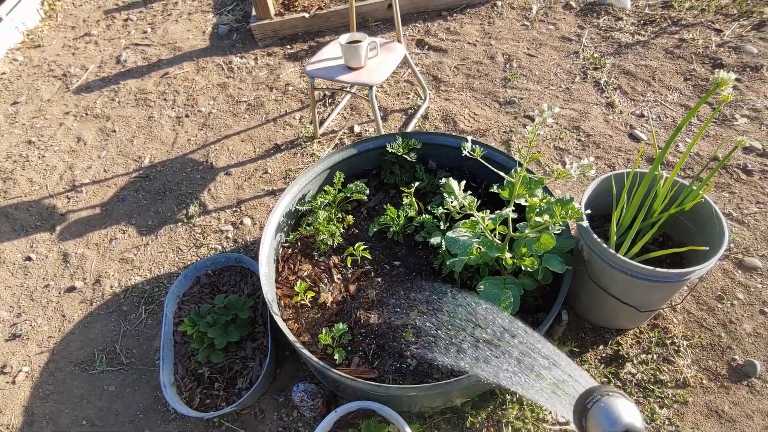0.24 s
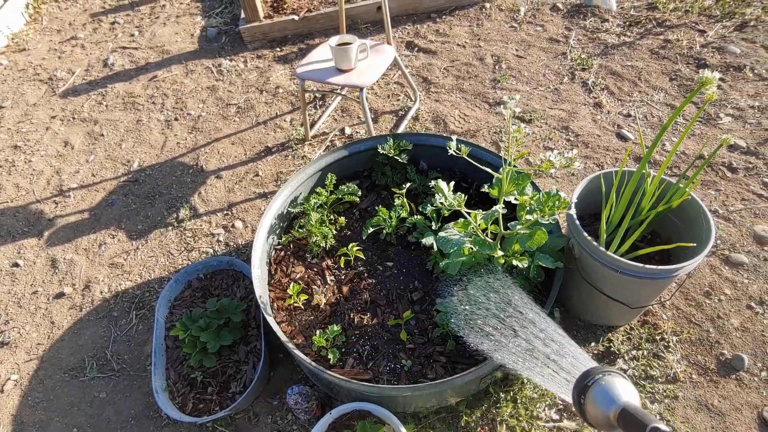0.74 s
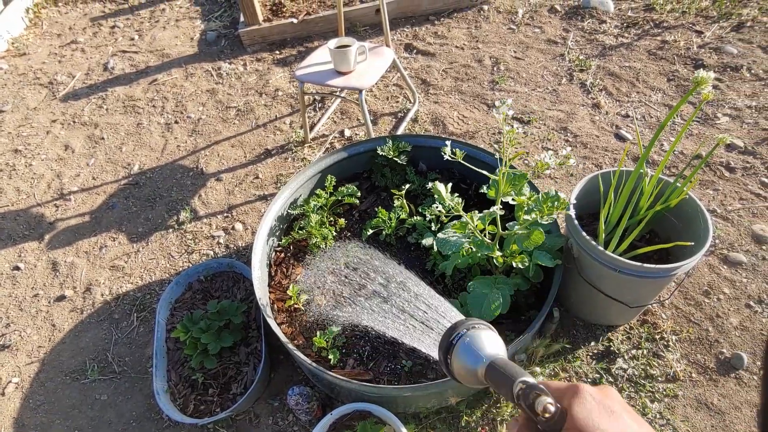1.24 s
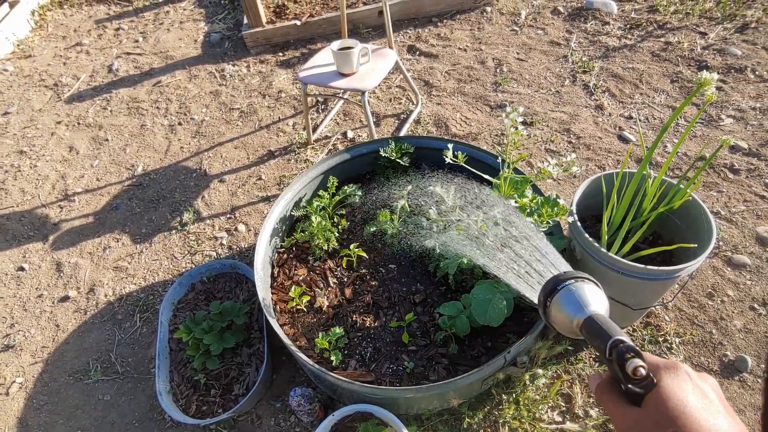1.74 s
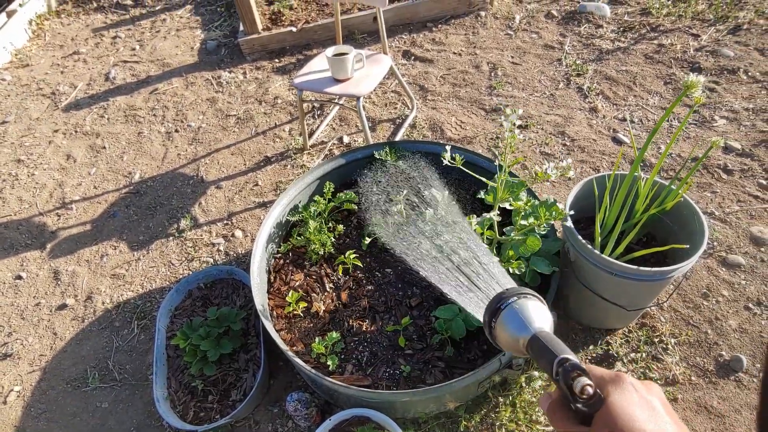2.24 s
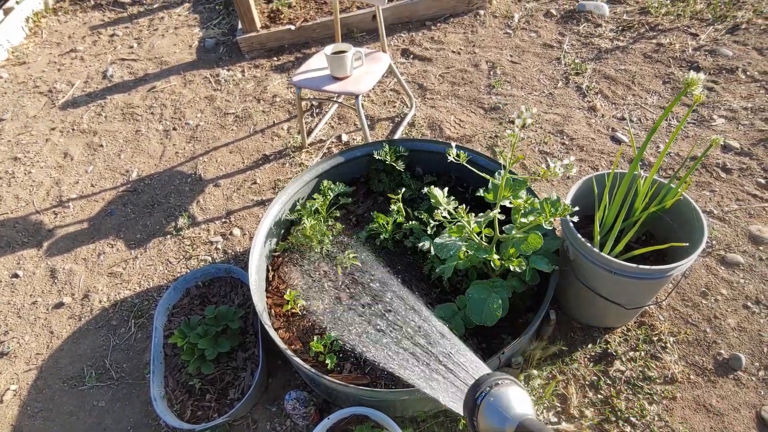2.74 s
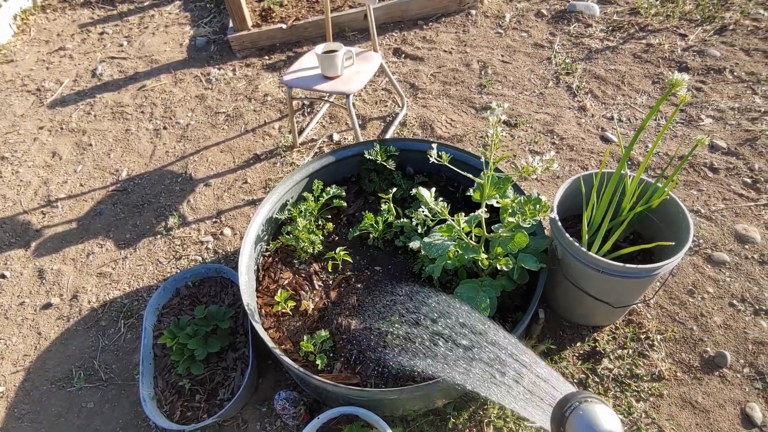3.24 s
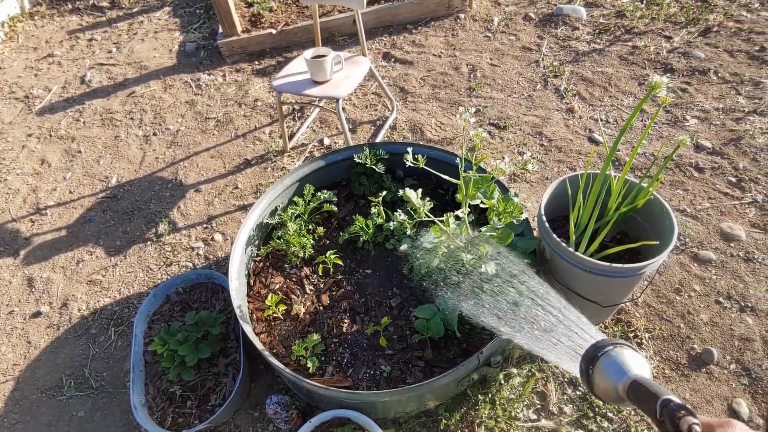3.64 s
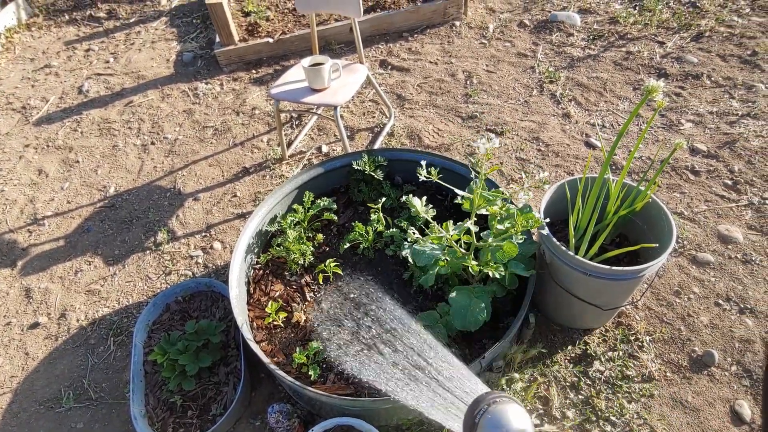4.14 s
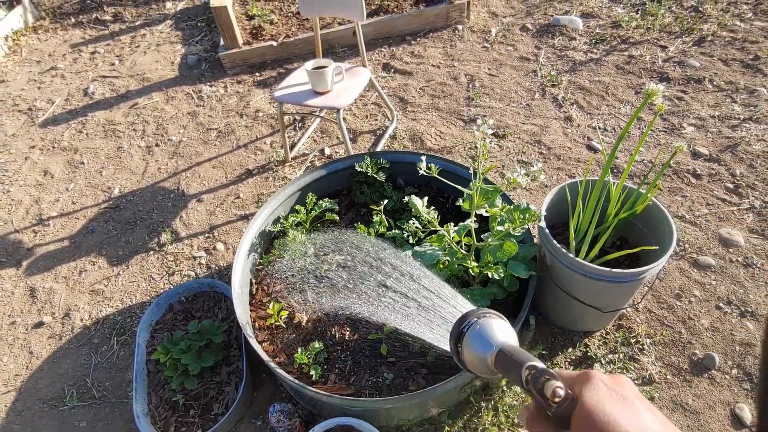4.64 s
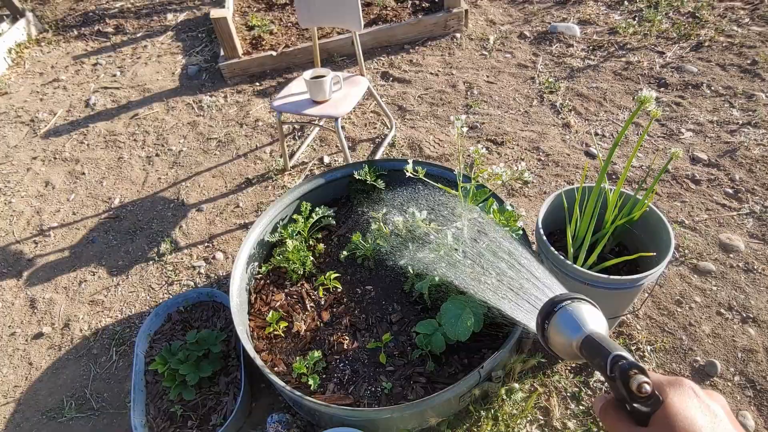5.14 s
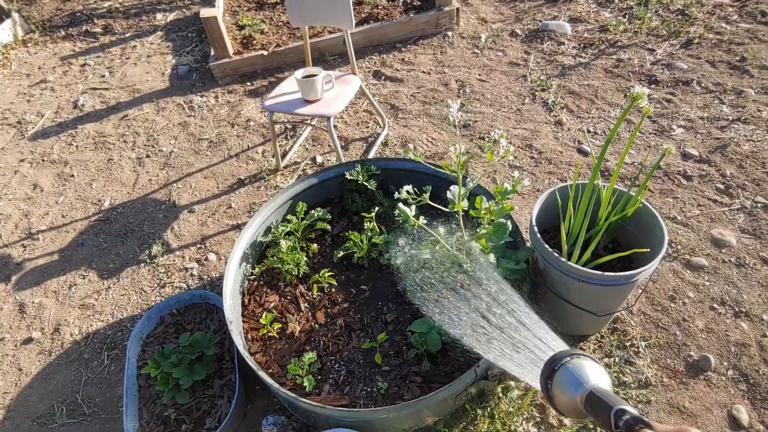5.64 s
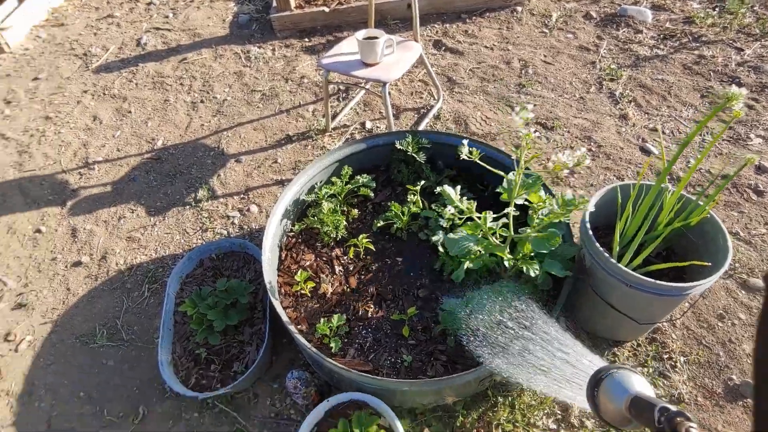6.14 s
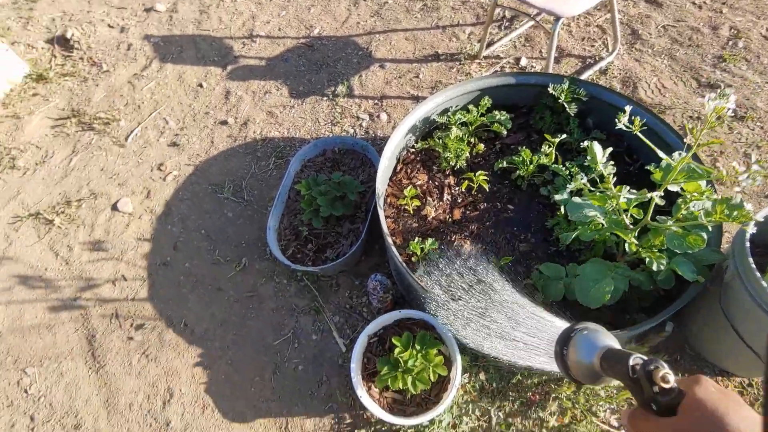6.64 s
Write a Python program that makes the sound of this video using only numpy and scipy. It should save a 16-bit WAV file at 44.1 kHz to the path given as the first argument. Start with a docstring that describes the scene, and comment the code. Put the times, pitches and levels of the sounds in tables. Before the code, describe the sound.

A hose shower nozzle hisses and sizzles steadily close by outdoors, water pattering on soil and drumming on leaves, with breathy ringing swells.

```python
"""Hose watering plants in a metal tub

A hose with a shower nozzle is heard outdoors from just behind the hand. Turbulence gives filtered noise
that hisses and fitfully sizzles; resonances sing and whistle. Random impacts patter brightly on bare soil
and drum more fully on leaves. Narrow noise bands make foam and gurgles, single fat drops smack, bubbles ping.
Puffs of air rumble on the microphone over a faint rumble and hum. Every level_db is a gain ahead of
any later filter, echo or balance.
"""
import sys
import numpy as np
from scipy import signal
from scipy.fft import rfft, irfft
from scipy.io import wavfile
from scipy.ndimage import map_coordinates

SR = 44100
rng = np.random.default_rng(int(sys.argv[2]) if len(sys.argv) > 2 else 0)


def unload_audio(sound):
    """Save the sound as a 16-bit wav file, at the path given as the first command line argument."""
    columns = np.transpose(np.atleast_2d(sound))
    # keep every value between -1 and 1, then stretch to whole-number steps
    steps = np.round(np.clip(columns, -1, 1) * 32767)
    wavfile.write(sys.argv[1], SR, steps.astype(np.int16))


N = 303408


def from_db(db):
    """Logarithmic level: 20 dB is a tenfold amplitude gain."""
    return 10 ** (np.asarray(db) / 20)


def rms_one(x):
    """Power normalisation: scale to unit rms."""
    return x / np.sqrt(np.mean(x ** 2) + 1e-20)


def in_time(rows):
    """Linear interpolation: each column of a time curve at every sample."""
    s, *columns = np.transpose(rows)
    return [np.interp(np.arange(N) / SR, s, c) for c in columns]


def drift(rate_hz):
    """Low-passed random process: white noise through two equal poles at rate_hz, spread 1."""
    step = 40    # samples between computed points
    r = np.exp(-2 * np.pi * rate_hz * step / SR)
    settle = 2000    # points dropped while the filter settles
    slow = signal.lfilter([1], [1, -2 * r, r * r], rng.standard_normal(N // step + settle + 2))[settle:]
    return np.interp(np.arange(N) / step, np.arange(len(slow)), rms_one(slow))


def colour(x, points, size=8192):
    """Minimum-phase filtering: a causal response whose magnitude follows (frequency_hz, gain_db)."""
    hz, db = np.transpose(points)
    grid = np.maximum(np.fft.rfftfreq(size, 1 / SR), 1)
    log_magnitude = np.log(from_db(np.interp(np.log(grid), np.log(hz), db)))
    cepstrum = irfft(log_magnitude)
    # folding the cepstrum onto positive time makes the response causal
    cepstrum[1:size // 2] *= 2
    cepstrum[size // 2 + 1:] = 0
    response = irfft(np.exp(rfft(cepstrum)))[:size // 2]
    return signal.oaconvolve(x, response[None], axes=1)[:, :N]


def stereo_noise(alike):
    """Partial coherence: white noise on two channels that share this fraction of their power."""
    alike = np.clip(alike, 0, 1)
    common = np.sqrt(alike) * rng.standard_normal(N)
    return common + np.sqrt(1 - alike) * rng.standard_normal((2, N))


def panned(x, left_db):
    """Interaural level difference: the left channel exceeds the right by left_db."""
    return x * from_db([[left_db / 2], [-left_db / 2]])


def bell(centre_s, spread_s):
    """Gaussian envelope: gain 1 at its centre, with spread_s as standard deviation."""
    t = np.arange(N) / SR
    return np.exp(-((t - centre_s) / spread_s) ** 2 / 2)


def burst(start_s, length_s, attack_s, release_s):
    """Exponential envelope: rises to 1 by the start, holds, then dies away."""
    t = np.arange(N) / SR
    before = np.maximum(start_s - t, 0) / attack_s
    after = np.maximum(t - start_s - length_s, 0) / release_s
    return np.exp(-np.minimum(before + after, 30))


def droplets(per_s, size_db, scatter_ms, scatter_db):
    """Shot noise: random impacts of uneven size, each with its own lag and balance between the ports."""
    at = np.flatnonzero(rng.random(N) < per_s / SR)
    size, side, lean = np.clip(rng.standard_normal((3, len(at))), -2.5, 2.5)
    push = from_db(size_db * size) * rng.choice([-1, 1], len(at))
    lag = np.round(scatter_ms * side * SR / 1000).astype(int)
    left = np.bincount((at + lag) % N, push * from_db(scatter_db * lean / 2), N)
    right = np.bincount(at, push * from_db(-scatter_db * lean / 2), N)
    return rms_one(np.array([left, right]))


def plinks(per_s, size_db, cycles, low_hz, high_hz, count=36):
    """Damped resonance: random impulses ring two-pole resonators, falling 60 dB in the given cycles."""
    at = np.flatnonzero(rng.random(N) < per_s / SR)
    size = np.clip(rng.standard_normal(len(at)), -2, 2)
    push = from_db(size_db * size) * rng.choice([-1, 1], len(at))
    dealt = rng.integers(0, count, len(at))    # which resonator each impulse strikes
    out = np.zeros((2, N))
    for k, hz in enumerate(np.geomspace(low_hz, min(high_hz, SR / 3), count)):
        w = 2 * np.pi * hz / SR
        r = np.exp(-np.log(1000) * hz / (cycles * SR))
        clicks = np.bincount(at[dealt == k], push[dealt == k], N) + 1e-18
        rung = w * signal.lfilter([np.sin(w)], [1, -2 * r * np.cos(w), r * r], clicks)
        out += panned(rung, rng.normal(0, 4))
    return rms_one(out)


def narrow_band(pitch_hz, width_hz):
    """Frequency shifting: low-passed complex noise is moved up to sing around a pitch; rms 1."""
    cloud = stereo_noise(alike=0.22) + 1j * stereo_noise(alike=1.0)
    cloud = signal.sosfilt(signal.butter(2, width_hz / 2, fs=SR, output="sos"), cloud)
    phase = 2 * np.pi * np.cumsum(pitch_hz * np.ones(N)) / SR
    return rms_one(np.real(cloud * np.exp(1j * phase)))


def tub_echoes(x, echo_db, longest_ms, swing, count=5):
    """Comb filtering: short tub-wall echoes on slowly wandering paths make the colour ripple."""
    out, now, gain = x.copy(), np.arange(N), from_db(echo_db)
    for share in np.geomspace(.15, 1, count):
        path = share * longest_ms * SR / 1000 * np.exp(swing * drift(.45))    # nominal longest path
        for ear in (0, 1):
            delay = np.round(path + rng.normal(0, 2)).astype(int)
            out[ear] += gain * x[ear].take(now - delay, mode="wrap")
    return out / np.sqrt(1 + count * gain ** 2)


def nozzle():
    """Superposition: steady hiss, fitful sizzle and three kinds of resonance add at the nozzle."""
    sizzling, whistling = sizzle_fits()
    crackle = droplets(per_s=25000, size_db=1.0, scatter_ms=.035, scatter_db=9.0)
    crackle = crackle * from_db(1.0 * drift(22))
    jet = hiss() + sizzle(crackle, sizzling, whistling) + head_ring(crackle, sizzling)
    return jet + hollow() + hole_whistles()


# slow course of the hiss: time_s, level_db
HISS_LEVEL = [(0, -26), (.75, -30.5), (1.75, -32.5), (2.0, -32), (3.3, -31.5), (3.45, -23), (4.4, -27.5),
              (6.0, -34.5), (6.88, -35)]
# spectrum of the hiss: frequency_hz, gain_db
HISS_COLOUR = [(150, -9), (280, -12.5), (385, -5.5), (560, -17.5), (720, -22), (1000, -18), (1250, -21),
               (1550, -7.5), (1950, -19.5), (2400, -11.5), (5000, -10.5), (11000, -28), (15000, -5)]


def hiss():
    """Turbulence noise: dense random impulses at the holes fuse into a coloured hiss."""
    level_db, = in_time(HISS_LEVEL)
    turbulence = droplets(per_s=25000, size_db=3.5, scatter_ms=0.043, scatter_db=5.5)
    turbulence = turbulence * from_db(level_db + 1.0 * drift(28.0))
    return panned(colour(turbulence, HISS_COLOUR), left_db=-2.5)


# fits of sizzling: start_s, length_s, level_db, whistle_db (relative to the sizzle)
SIZZLE_FITS = [(0.0, 0.13, -21.5, -8), (.52, 0.04, -18.5, -13), (0.628, .02, -22, -4),
               (0.8, .09, -16.5, -6), (0.89, 0.99, -14, -1.5), (1.967, 0.014, -20.5, -7),
               (2.1, 0.05, -19.5, -6), (2.447, .018, -23.5, -10.5), (3.375, 0.2, -20.5, 8),
               (3.64, .18, -22, -1), (4.37, 0.054, -13.5, -12), (4.555, 0.5, -14, -15),
               (5.1, 1.85, -21.5, -17)]
SIZZLE_ATTACK_S, SIZZLE_RELEASE_S = .008, .011
SIZZLE_IDLE_DB, WHISTLE_IDLE_DB = -36, -31    # floors between fits
# drop from the middle of a fit to its ends; a negative one is a rise
SIZZLE_ARCH_DB, WHISTLE_ARCH_DB = 2, -0.5


def sizzle_fits():
    """Intermittency: gains of sizzle and whistle start abruptly, arch slightly and cut out."""
    t = np.arange(N) / SR
    sizzling, whistling = from_db(SIZZLE_IDLE_DB), panned(from_db(WHISTLE_IDLE_DB), left_db=2)
    for start_s, length_s, db, whistle_db in SIZZLE_FITS:
        off_middle = (2 * np.clip((t - start_s) / length_s, 0, 1) - 1) ** 2
        fit = from_db(db) * burst(start_s, length_s, SIZZLE_ATTACK_S, SIZZLE_RELEASE_S)
        sizzling = np.maximum(sizzling, fit * from_db(-SIZZLE_ARCH_DB * off_middle))
        whistling = np.maximum(whistling, fit * from_db(whistle_db - WHISTLE_ARCH_DB * off_middle))
    return sizzling, whistling


# spectrum of the sizzle: frequency_hz, gain_db
SIZZLE_COLOUR = [(1200, -43.5), (1550, -22.5), (1850, -17.5), (2200, -27), (3100, -38), (3600, -14),
                 (4200, -14), (5000, -20.5), (6700, -9.5), (7600, -23), (8500, -16.5), (10300, -12),
                 (12500, -13), (15000, -8)]
# spectrum of the thin, airy whistle of the holes: frequency_hz, gain_db
WHISTLE_COLOUR = [(3000, -78), (6700, -16), (7250, -5.5), (7560, -10.5), (7850, -9), (8500, -16.5),
                  (15000, -54.5)]


def sizzle(crackle, sizzling, whistling):
    """Common excitation: one crackle drives both the broad sizzle and the thin whistle."""
    broad = colour(crackle * sizzling, SIZZLE_COLOUR)
    thin = colour(crackle * whistling, WHISTLE_COLOUR)
    return panned(broad + thin, left_db=-3.0)


# swelling and fading of the spray head's bright ring: time_s, level_db
RING_LEVEL = [(0, -36), (.78, -27), (.83, -25), (1.05, -17.5), (1.22, -18), (1.32, -10), (1.54, -8),
              (1.72, -14), (1.86, -27), (1.9, -35), (2.4, -28.5), (3.33, -33), (3.45, -13), (3.6, -26),
              (3.76, -12), (3.9, -32), (4.33, -28), (4.41, -20), (4.51, -35), (4.57, -12.5), (4.97, -10),
              (5.25, -16.5), (5.7, -19.5), (6.88, -13)]
# resonances of the spray head: frequency_hz, gain_db
RING_COLOUR = [(2200, -46), (3150, -35), (3380, -7.5), (3560, -1), (3700, -6), (3950, -3.5), (4250, -7),
               (4900, -31.5), (8000, -58.5)]


def head_ring(crackle, sizzling):
    """Forced resonance: crackle excites the spray head, harder during each sizzle fit."""
    level_db, = in_time(RING_LEVEL)
    ringing = np.hypot(from_db(level_db), from_db(-2) * sizzling)
    ring = colour(crackle * ringing * from_db(1.73 * drift(19.0)), RING_COLOUR)
    return panned(ring, left_db=1.0)


# low singing of the hollow behind the nozzle's face: time_s, level_db
HOLLOW_LEVEL = [(0, -28), (.7, -30.5), (1.05, -28), (1.35, -22.5), (1.7, -24), (1.95, -31), (2.9, -31),
                (3.3, -38), (3.45, -23), (3.58, -38), (4.05, -36), (4.35, -24.5), (4.85, -24.5), (5.2, -27),
                (5.4, -41), (6.88, -43)]
# resonances of that hollow: frequency_hz, gain_db
HOLLOW_COLOUR = [(800, -46), (1250, -27), (1400, -11.5), (1520, -3.5), (1600, -5), (1660, 0.5),
                 (1730, -3.5), (1830, -16), (2000, -28), (2600, -40), (5000, -59)]


def hollow():
    """Cavity resonance: the hollow sings as coloured noise, with a thin note inside it."""
    level_db, = in_time(HOLLOW_LEVEL)
    breath = stereo_noise(alike=0.81) * from_db(level_db + 1.5 * drift(15))
    note_db = -27    # added to the hollow's level
    return panned(colour(breath, HOLLOW_COLOUR) + from_db(level_db + note_db) * flow_note(), left_db=-.5)


def flow_note():
    """Frequency modulation: a thin tone trembles in pitch and flutters in level; rms 1."""
    hz = 1662 * np.exp(.013 * drift(34.9))
    return rms_one(np.sin(2 * np.pi * np.cumsum(hz) / SR) * from_db(3.5 * drift(30)))


# momentary whistles of single holes: centre_s, spread_s, pitch_hz, level_db, left_db
HOLE_WHISTLES = [(1.04, 0.1, 7400, -37.5, -2), (1.43, 0.18, 7600, -39.5, -5), (1.15, .18, 18000, -48, -3),
                 (1.5, .13, 9300, -45, 2), (1.4, .3, 14700, -38, 8), (1.69, 0.1, 10250, -39, -8),
                 (1.62, .06, 11350, -48, 5), (6.12, 0.11, 8050, -37, -4), (6.13, .08, 5600, -39, 7),
                 (6.65, 0.16, 7950, -39, -11)]


def hole_whistles():
    """Narrow-band noise: single holes whistle breathily, swell and fade, and wander in pitch."""
    out = np.zeros((2, N))
    for centre_s, spread_s, hz, db, left_db in HOLE_WHISTLES:
        whistle = narrow_band(hz * np.exp(.012 * drift(2.5)), width_hz=0.052 * hz)
        out += panned(from_db(db) * bell(centre_s, spread_s) * whistle, left_db)
    return out


# force of the spray on the soil as the fan of drops wanders: time_s, level_db
SOIL_LEVEL = [(0, -29.5), (.55, -28.5), (.72, -39.5), (1.02, -28.5), (1.42, -35), (1.86, -29.5),
              (1.92, -42), (2.45, -40.5), (3.355, -29.5), (3.38, -22.5), (3.6, -23), (3.9, -31),
              (4.0, -23.5), (4.7, -22.5), (5.22, -24.5), (5.3, -29), (5.6, -29), (6.09, -18.5),
              (6.33, -24.5), (6.7, -20), (6.88, -24.5)]
# lean of the landing spray as the hand swings, then moves on: time_s, left_db
AIM = [(0, 3), (.6, 0), (2.0, 2.5), (2.8, 4.5), (3.6, 1.5), (4.6, 2.5), (6.2, 1)]


def landing_spray():
    """Superposition: water on soil, leaves and foam adds up and leans with the aim."""
    soil_db, = in_time(SOIL_LEVEL)
    lean_db, = in_time(AIM)
    leaf_db = leaf_level(soil_db)
    landing = soil(soil_db) + leaves(leaf_db) + splashing(leaf_db)
    return landing * from_db([lean_db / 2, -lean_db / 2])


def fluttering(level_db):
    """Amplitude modulation: uneven break-up of the streams makes a landing gain flutter."""
    return from_db(level_db + 1.3 * drift(22))


# spectrum of drops on soil: frequency_hz, gain_db
SOIL_COLOUR = [(150, -19.5), (1500, -26), (3000, -4), (5000, -5), (7200, -1.5), (8200, -2.5), (10000, -6),
               (15000, -1.5)]


def soil(level_db):
    """Impact noise: fine ticks, sparse coarse ones and ringing bubbles patter on wet earth."""
    ticks = droplets(per_s=6000, size_db=3.0, scatter_ms=.07, scatter_db=3.5)
    coarse = droplets(per_s=130, size_db=2.0, scatter_ms=.07, scatter_db=5.0)
    coarse = signal.sosfilt(signal.butter(2, [5500, 13000], "band", fs=SR, output="sos"), coarse)
    fizz = plinks(per_s=600, size_db=3.5, cycles=65, low_hz=5320, high_hz=14600)
    patter = ticks + from_db(-6.0) * coarse + from_db(-12.0) * fizz
    return colour(patter * fluttering(level_db), SOIL_COLOUR)


# passes of the spray over leaves: start_s, length_s, level_db
LEAF_PASSES = [(0.358, 0.2623, -26.5), (0.875, .12, -28.5), (3.385, 0.1693, -25), (3.58, 0.1213, -21),
               (3.72, 0.3297, -23), (4.599, .55, -29.5), (5.2, .58, -24), (5.84, 0.11, -19),
               (6.172, .28, -23), (6.849, .05, -21.5)]


def leaf_level(soil_db):
    """Energy addition: passes, a steady trickle and rebound from the soil sum in power, in dB."""
    passes = [from_db(db) * burst(start_s, length_s, attack_s=.02, release_s=.09)
              for start_s, length_s, db in LEAF_PASSES]
    strongest = np.max(passes, axis=0)
    trickle, rebound = from_db(-39), from_db(soil_db - 10)
    return 10 * np.log10(strongest ** 2 + trickle ** 2 + rebound ** 2)


# spectrum of drops on leaves: frequency_hz, gain_db
LEAF_COLOUR = [(100, -30.5), (200, -10), (300, -6.5), (400, -5.5), (520, -5), (650, -9), (800, -11),
               (1100, -13), (1350, -14), (2100, -7.5), (3200, -1.5), (5000, -6.5), (8000, -12.5),
               (15000, -11)]


def leaves(level_db):
    """Struck resonators: drops drum on leaves with taps, rings and soft low thuds."""
    taps = droplets(per_s=6000, size_db=5.0, scatter_ms=.06, scatter_db=6.5)
    rings = plinks(per_s=600, size_db=15.5, cycles=220, low_hz=897, high_hz=4428)
    thuds = plinks(per_s=160, size_db=5.5, cycles=15, low_hz=144, high_hz=1013)
    splatter = taps + from_db(-15.0) * rings + from_db(-23.0) * thuds
    return panned(colour(splatter * fluttering(level_db), LEAF_COLOUR), left_db=-0.7)


# gurgles and froth where the jet digs into soil or fills a leaf: centre_s, spread_s, pitch_hz, level_db
GURGLES = [(0.55, 0.038, 275, -48), (0.9, 0.035, 620, -48), (3.648, 0.14, 200.6, -52),
           (4.043, 0.14, 258, -47.5), (4.85, 0.13, 1877, -45.5), (5.927, 0.081, 408.4, -42),
           (6.104, 0.13, 2050, -46.5), (6.38, 0.13, 1080, -48.5), (6.598, 0.13, 399, -47),
           (6.65, 0.22, 2053, -44.5), (6.856, 0.053, 624, -41.5)]


def splashing(leaf_db):
    """Bubble resonance: foam sings higher the harder the leaves are hit; hollows gurgle briefly."""
    foam_hz = 1968 + 16 * (leaf_db + 29)    # rises 16 Hz per dB
    foam_db = 1.097 * leaf_db - 19.0    # foam builds up faster than the drumming that makes it
    out = narrow_band(foam_hz * np.exp(.07 * drift(6)), width_hz=900) * fluttering(foam_db)
    for centre_s, spread_s, hz, db in GURGLES:
        out = out + from_db(db) * bell(centre_s, spread_s) * narrow_band(hz, width_hz=0.25 * hz)
    return out


# swing of the hand from side to side, as delay of the left port: time_s, lag_ms
SWING = [(0, .08), (.7, .17), (1.05, .06), (1.35, .005), (1.9, .09), (2.65, .03), (3.3, .07), (3.75, .14),
         (4.1, .06), (4.6, .005), (5.0, .06), (5.45, .1), (5.95, .06), (6.5, .17), (6.88, .07)]


def swung(x):
    """Interaural time difference: the left port hears the spray with a varying lag."""
    lag_ms, = in_time(SWING)
    heard_at = np.arange(N) - lag_ms * SR / 1000
    left = map_coordinates(x[0], [heard_at], order=5, mode="mirror")
    return np.array([left, x[1]])


# fat drops that smack close by: start_s, level_db, left_db
FAT_DROPS = [(0.352, 8, -1), (0.4034, -2, -1), (0.494, -7, 0), (1.9731, -12, 0), (2.2074, -18, 4),
             (2.4546, -13, 0), (2.8832, -12, 5), (3.023, -2, -2), (3.1136, -9, 0), (3.382, 0, 0),
             (3.5336, 3.5, 0), (3.5807, 3, -2), (3.5965, 3, -2), (3.999, -3, 0), (4.0447, -4, -4),
             (4.116, 3, -2), (4.256, -1, 0), (4.3804, 2, 0), (4.9698, 3, -2), (5.1599, 0, 3),
             (5.5768, -7, 0), (5.8621, -3, 5), (6.125, 3, 0), (6.348, 4, -4), (6.3581, 0, -3),
             (6.4248, -3, 0), (6.7026, 0, 4), (6.7077, -1, 3)]
# spectrum of the smacks: frequency_hz, gain_db
SMACK_COLOUR = [(300, -23), (1500, -11), (4000, -14), (7500, 5), (11000, -2), (15000, -5)]


def fat_drops(smack_db, splash_db, splash_s):
    """Impulse excitation: one hard smack, then a few milliseconds of decaying noise splash."""
    out, age = np.zeros((2, N)), np.arange(SR // 20) / SR
    for start_s, db, left_db in FAT_DROPS:
        shape = from_db(splash_db) * rng.standard_normal((2, len(age))) * np.exp(-age / splash_s)
        shape[:, 0] = 1    # the smack itself
        at = round(start_s * SR)
        out[:, at:at + len(age)] += from_db(db + smack_db) * panned(shape, left_db)[:, :N - at]
    return colour(out, SMACK_COLOUR)


# high pings of bursting bubbles: start_s, pitch_hz, t60_s, level_db, left_db
PINGS = [(2.2062, 9500, .004, -30, 6), (2.4007, 13500, .004, -25, 4), (2.74, 12350, .03, -31, 0),
         (3.5965, 10600, .01, -16, 10), (3.9305, 12500, .001, -15, 4), (3.999, 10600, .008, -17, 8),
         (4.1963, 14000, .002, -9, 3), (5.5768, 12000, .001, -15, 3)]


def pings():
    """Free decay: each burst bubble is one exponentially dying tone."""
    out, age = np.zeros((2, N)), np.arange(SR // 20) / SR
    for start_s, hz, t60_s, db, left_db in PINGS:
        at = round(start_s * SR)
        tone = from_db(db - 60 * age / t60_s) * np.sin(2 * np.pi * hz * age)
        out[:, at:at + len(age)] += panned(tone, left_db)
    return out


def wet_earth(level_db):
    """Damped resonance: soaked soil keeps ticking softly with tiny bursts."""
    return from_db(level_db) * plinks(per_s=40, size_db=4.0, cycles=18, low_hz=9000, high_hz=14500, count=10)


# puffs of air on the microphone: centre_s, spread_s, level_db
PUFFS = [(1.18, 0.025, -41.5), (1.28, 0.035, -43.5), (1.512, 0.03, -51), (1.73, 0.05, -51),
         (2.199, 0.025, -33.5), (5.139, 0.072, -52), (6.525, 0.013, -41)]
# spectrum of the puffs: frequency_hz, gain_db
PUFF_COLOUR = [(12, -18), (25, -3), (45, 11), (80, -1), (130, -10.5), (300, -47), (1000, -73)]


def wind_puffs():
    """Pressure turbulence: brief Gaussian gusts gate low rumbling noise at the ports."""
    gust = sum(from_db(db) * bell(centre_s, spread_s) for centre_s, spread_s, db in PUFFS)
    rumble = rms_one(colour(stereo_noise(alike=0.28), PUFF_COLOUR))
    return panned(gust * rumble, left_db=8)


# spectrum of the distant background: frequency_hz, gain_db
YARD_COLOUR = [(12, -20), (30, -16), (45, -19), (58, -2), (80, -3), (130, -13), (250, -13.5), (1000, -44),
               (5000, -53)]


def yard():
    """Stationary noise: a faint distant rumble, mostly alike at both ports."""
    rumble = from_db(-56.5) * rms_one(colour(stereo_noise(alike=0.68), YARD_COLOUR))
    return panned(rumble, left_db=-1.5)


# hum of a distant machine: pitch_hz, level_db
HUM = [(45, -60.5), (107.7, -62)]


def distant_hum():
    """Pure tones: a machine's hum wavers slowly in level and phase."""
    t, out = np.arange(N) / SR, np.zeros(N)
    for hz, db in HUM:
        tone = np.sqrt(2) * np.sin(2 * np.pi * hz * t + 0.59 * drift(3.5))    # rms 1
        out += from_db(db + 2.0 * drift(0.48)) * tone
    return panned(out, left_db=-1.5)


def scene():
    """Superposition: nozzle close by, water landing inside the tub, open air around."""
    jet = tub_echoes(nozzle(), echo_db=-11.5, longest_ms=11.0, swing=.07)
    landing = tub_echoes(landing_spray(), echo_db=-9.5, longest_ms=7.0, swing=.13)
    smacks = fat_drops(smack_db=-6.0, splash_db=-18, splash_s=.0018)
    ticking = pings() + wet_earth(level_db=-50.5)
    air = wind_puffs() + yard() + distant_hum()
    return swung(jet + landing) + smacks + ticking + air


# resonances of the two microphone ports: frequency_hz, left_gain_db, right_gain_db
PORTS = [(150, -3.5, -8.5), (760, -5, -6), (945, 3, -0.5), (1960, 2, -1.5), (2840, -4, -4),
         (3930, -6.5, -1), (4460, -2, -3), (5610, 3, -12), (6445, 5.5, -5.5), (7510, 14.5, 6.5),
         (8700, 8, 8), (10100, 5, 6), (12370, 2, -3), (16300, -4, -22)]


def record(dry):
    """Transducer response: each port resonates, peaks saturate softly and the top is cut."""
    ports = np.array(PORTS)
    heard = np.vstack([colour(dry[[ear]], ports[:, [0, ear + 1]]) for ear in (0, 1)])
    rounded = 1.2 * np.tanh(heard / 1.2)
    top_cut = signal.ellip(12, .1, 80, 16000, fs=SR, output="sos")    # low-pass at 16 kHz
    return signal.sosfilt(top_cut, rounded)


dry = scene()
out = record(dry)
unload_audio(out)
```